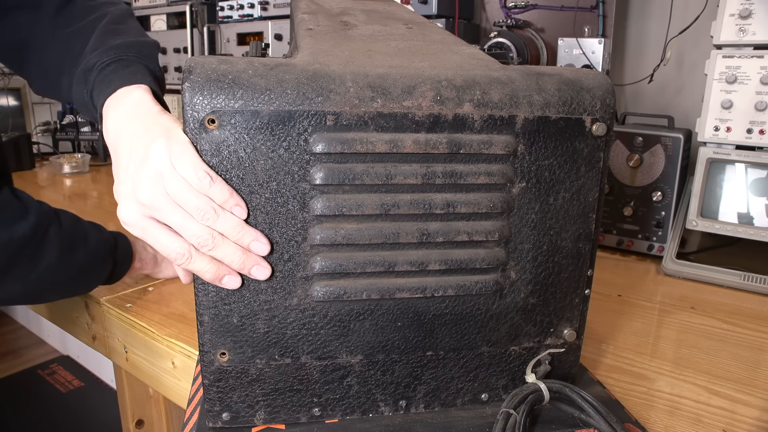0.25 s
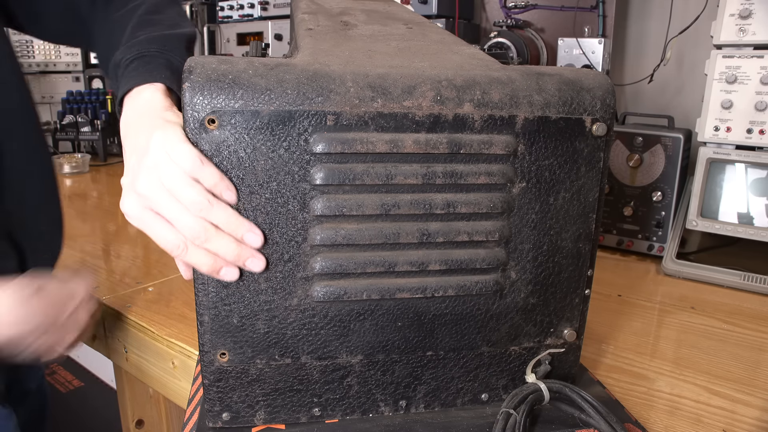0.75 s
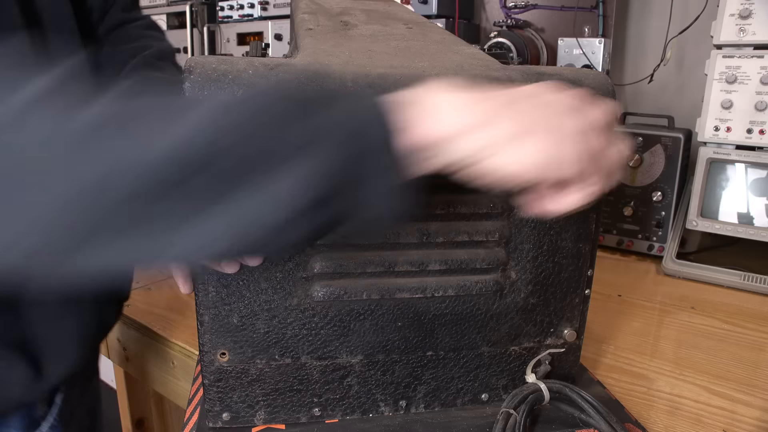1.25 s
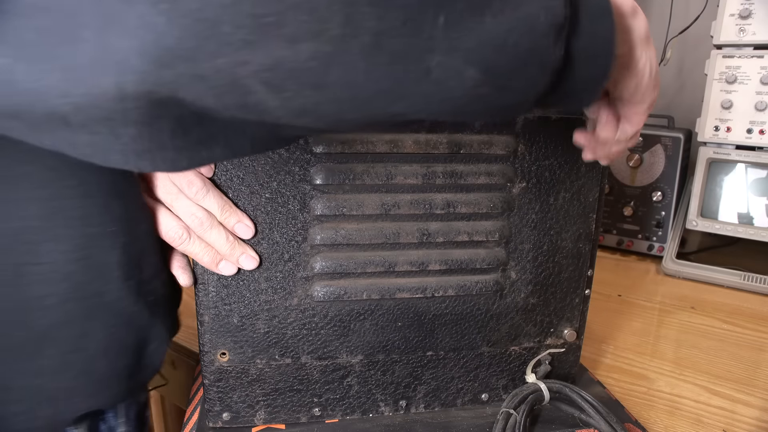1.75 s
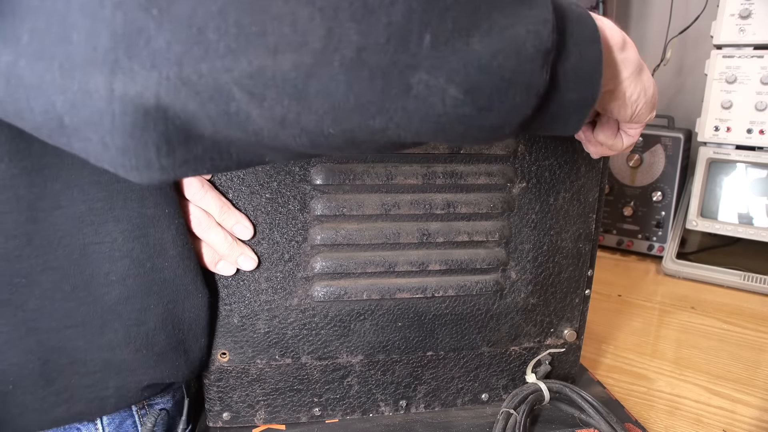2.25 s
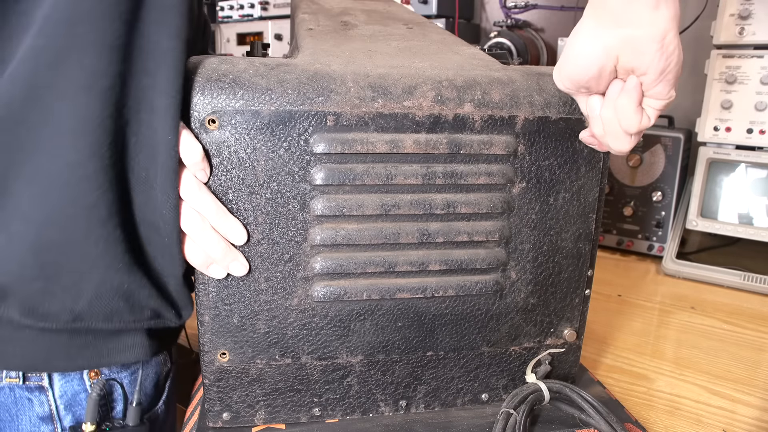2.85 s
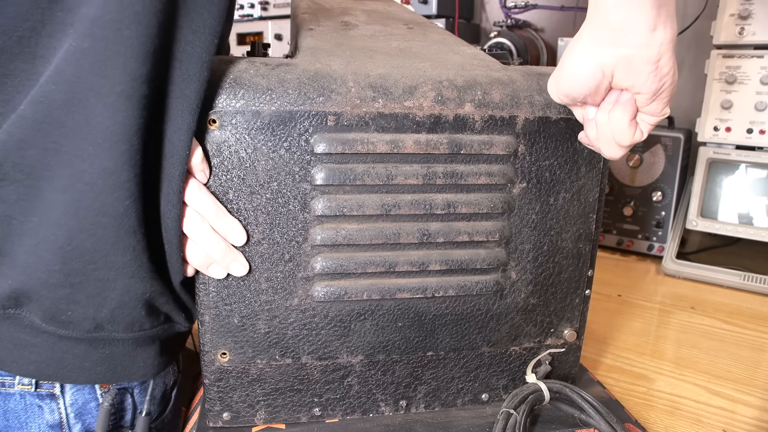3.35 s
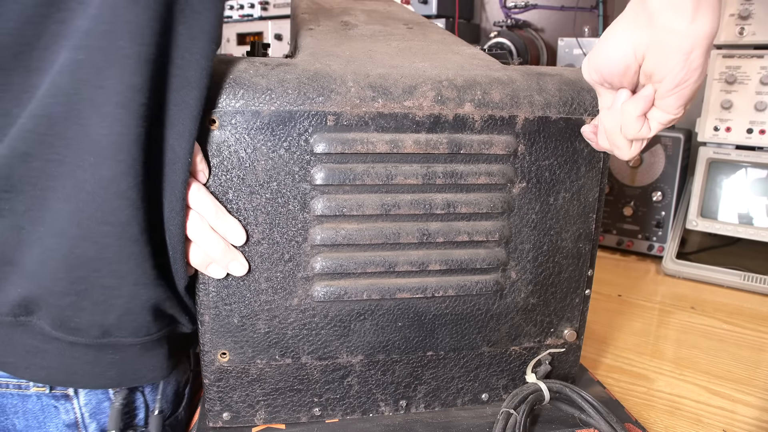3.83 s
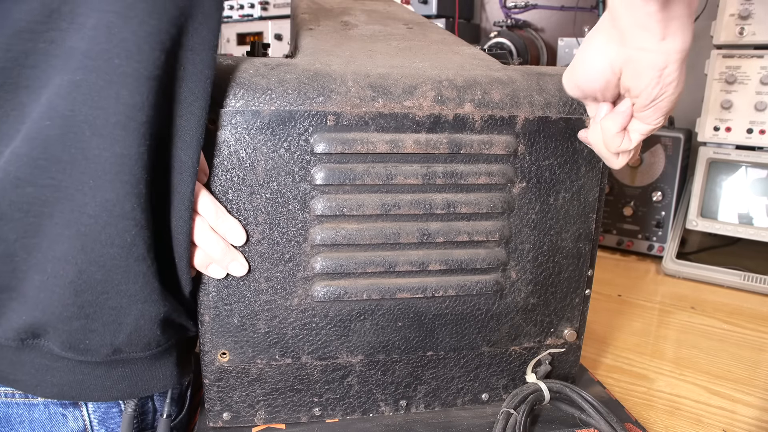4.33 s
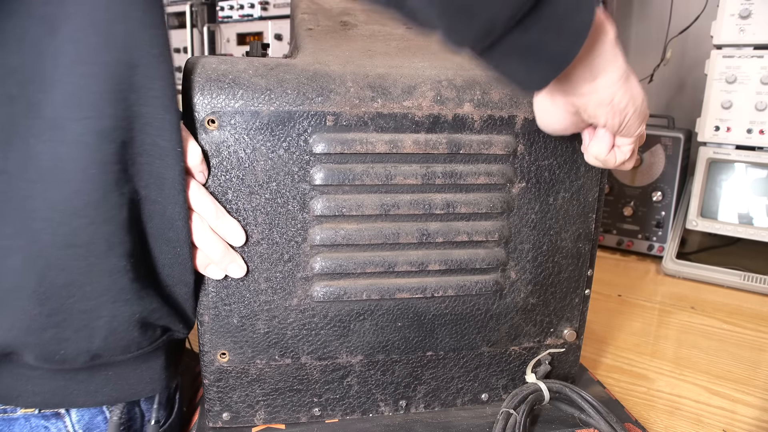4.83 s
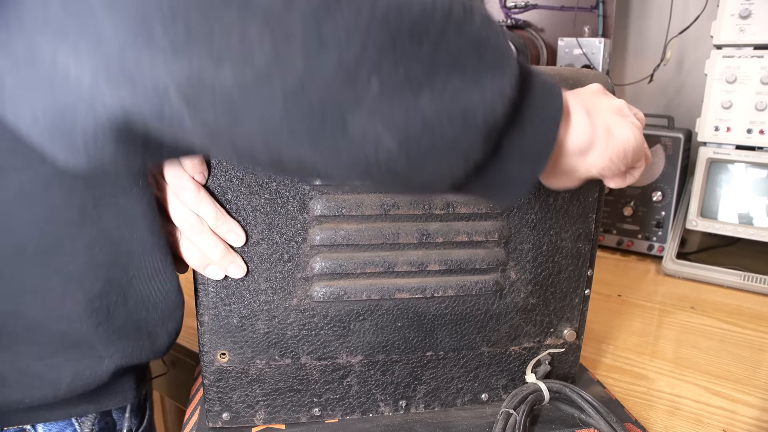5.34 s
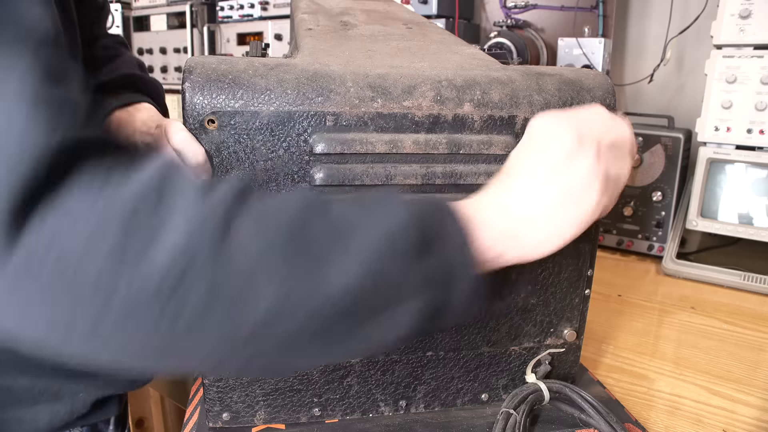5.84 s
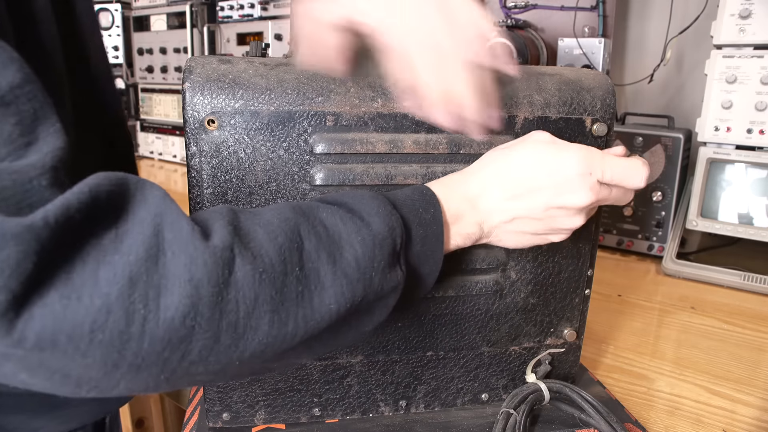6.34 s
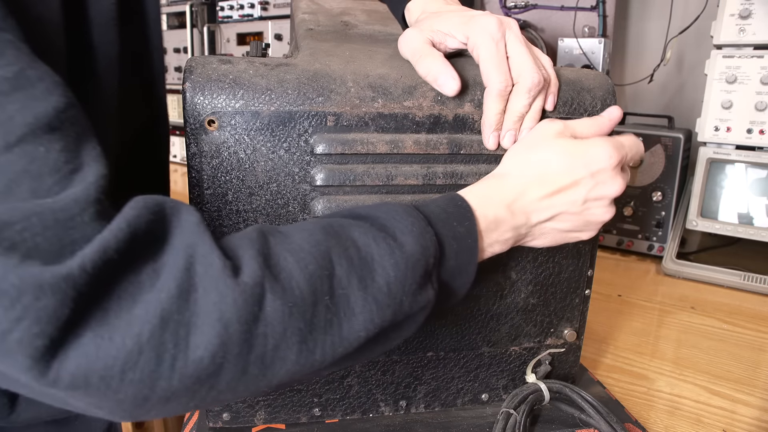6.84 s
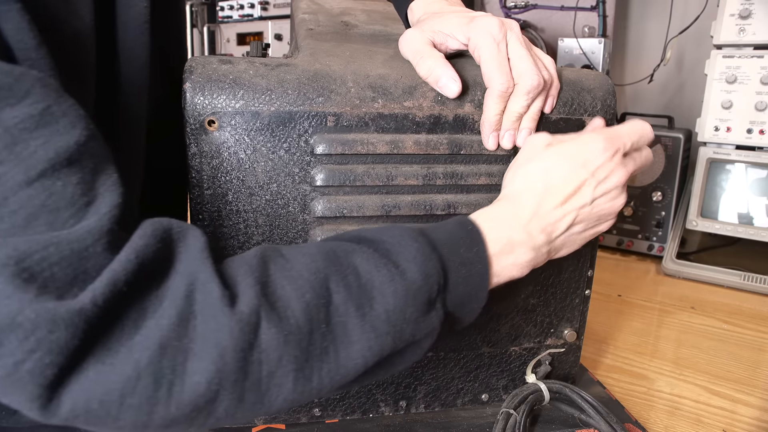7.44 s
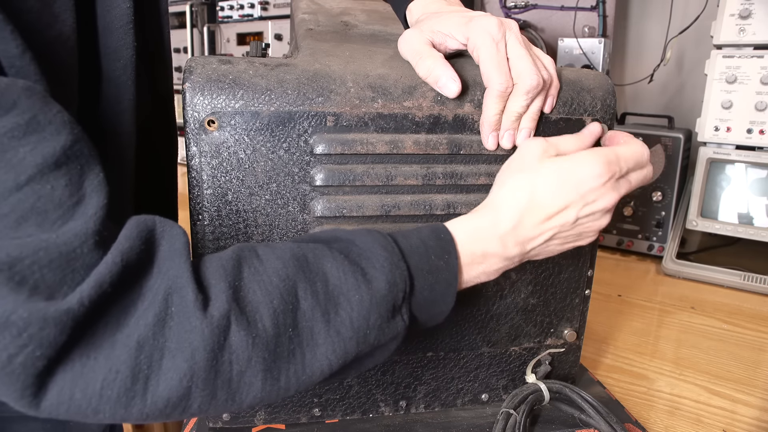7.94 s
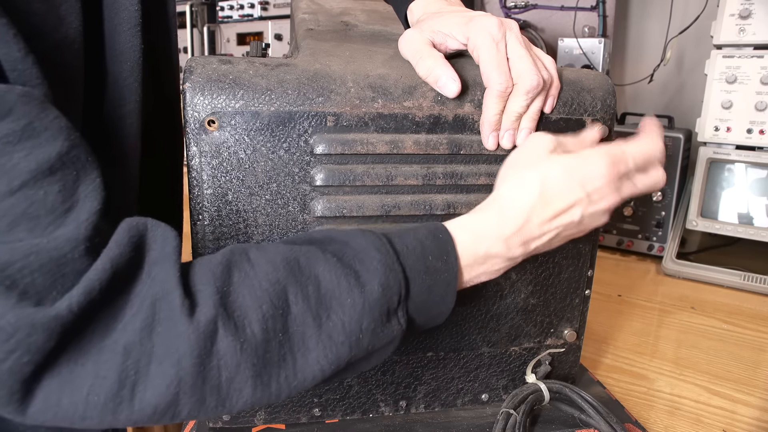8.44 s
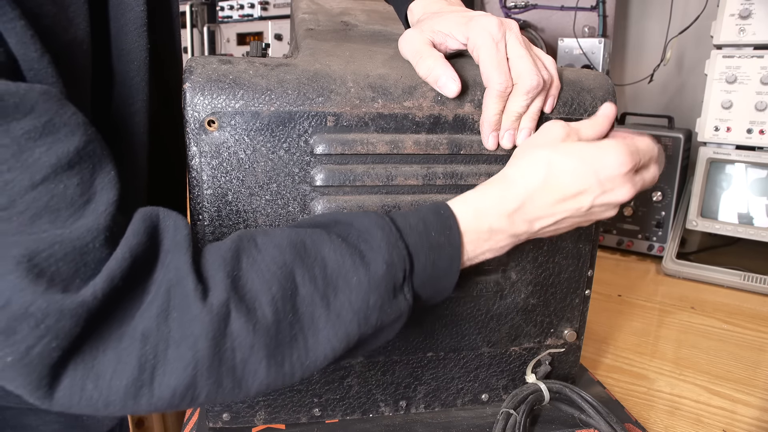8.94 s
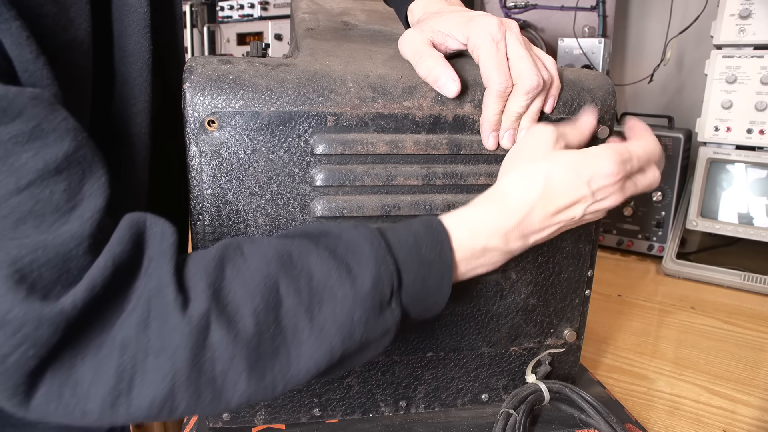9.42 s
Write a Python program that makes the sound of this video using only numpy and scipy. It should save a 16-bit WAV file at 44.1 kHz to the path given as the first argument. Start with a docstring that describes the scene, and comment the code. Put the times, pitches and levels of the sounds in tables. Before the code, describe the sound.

Hands rub and knock on a steel cabinet panel, with a sharp hardware clack, small ticks and ringing clatter as a screw turns.

```python
"""A small workshop: hands undo the screwed back panel of an old steel-and-wood cabinet on the bench. Hardware
clacks down and a ring lingers in the room. Palms and sleeves rub over the case in tiny slips. A loose screw,
twirled out by hand, grinds, squeaks once and clacks against the louvred steel panel, which rings. Leaning hands
rock the cabinet, which booms softly. Small dry ticks sound close by, over quiet air."""
import sys
import numpy as np
from scipy import signal
from scipy.fft import rfft, irfft, next_fast_len
from scipy.io import wavfile

SR = 44100
rng = np.random.default_rng(int(sys.argv[2]) if len(sys.argv) > 2 else 0)


def digitize_waveform(pressure):
    """Quantize a signal to 16-bit integers and store it at the path in sys.argv[1].

    Rows of a 2-D input are taken as channels; values are limited to [-1, 1].
    """
    field = np.atleast_2d(pressure).T
    bounded = np.clip(field, -1, 1)
    quanta = np.round(bounded * 32767).astype(np.int16)
    wavfile.write(sys.argv[1], SR, quanta)


N = 426888
TIME_S = np.arange(N) / SR
TAIL_S = TIME_S[:32768]

# Modes. Each row: frequency in Hz, level in dB, t60 in seconds.
STEEL_PANEL_MODES = [(244, -1.5, 0.34), (403, -1.5, 0.23), (625, -3.5, 0.38), (713, -2, 0.34),
                     (764.3, -1.5, 0.24), (829, -9, 0.41), (941, -2, 0.37), (1162, -6.5, 0.29),
                     (1417, -10, 0.2), (1634, -2, 0.24), (1923, -5.5, 0.2), (2077, -1.5, 0.22),
                     (2320, -2.5, 0.08), (2495, 3.5, 0.13), (3300, 1.5, 0.12), (4060, 1, 0.063),
                     (6330, 8, 0.11), (8250, 18.5, 0.026)]
BOX_MODES = [(91.6, 3.5, 0.43), (120, -7, 0.26), (162.3, -9, 0.28), (267.4, -13, 0.76)]  # cabinet and the air inside
LOOSE_SCREW_MODES = [(2610, 1, 0.13), (2780, -3, 0.2), (3140, -2, 0.23), (3592, -3, 0.14), (4050, -4, 0.24),
                     (5250, -4, 0.17)]
CLACK_RING_MODES = [(577, -3.5, 0.5), (1366, 0, 0.56), (1486, 4.5, 0.51), (1687, -1, 0.52), (1780, 6, 0.48),
                    (2070, 2, 0.56), (2365, 5, 0.47), (2680, -6, 0.68)]  # tones lingering after the hardware lands

# Screw clacks on the case. Each row: start in seconds, ring in dB, treble in dB re ring.
SCREW_CLACKS = [(5.926, -37.5, -5), (6.753, -38.5, -13.5), (6.823, -36, -2.5), (7.255, -42, -27),
                (7.634, -43, -3), (7.766, -28.5, -7), (7.824, -23.5, -9.5), (7.910, -34.5, -6.5),
                (8.165, -37, -6), (8.185, -37, -4), (8.2704, -37.5, -13), (8.338, -30.5, -21),
                (8.36, -29, -7.5), (8.721, -34, -3), (8.728, -24, -2.5), (8.9331, -32, 0.5),
                (9.149, -29, -8), (9.223, -30.5, -8.5), (9.236, -33.5, -11), (9.261, -36.5, -8.5),
                (9.592, -39.5, -17)]
# Hands bump the case. Each row: start in seconds, ring in dB, bass and treble in dB re ring.
HAND_KNOCKS = [(0.949, -48.5, -7, -22), (1.72, -48.5, -2.5, -23), (1.791, -32.5, -4.5, -7),
               (1.796, -24, -10, -31.5), (1.819, -33, -4.5, -38), (3.712, -41, 5, -13.5),
               (3.733, -42.5, 5.5, -37.5), (4.266, -56, -7, -15), (4.403, -53, 6.5, -32),
               (4.567, -51, -14, -18), (6.133, -33.5, -9, -22.5), (6.241, -40, -9, -21.5)]
# Hardware lands. Each row: start in seconds, crack and ring in dB, bass and treble in dB re ring.
HARDWARE_HITS = [(0.1755, -33, -24.5, -10, -29), (0.1926, -7, -20.5, -14.5, -11.5)]
# A hand leans on the cabinet. Each row: start and creep half length in seconds, boom and palm in dB.
HAND_PUSHES = [(1.801, 0.16, -40.5, -53.5), (2.45, 0.089, -38.5, -47.5), (2.79, 0.18, -48, -50),
               (3.25, 0.44, -55, -54), (3.726, 0.061, -53, -48), (4.41, 0.068, -50, -48),
               (5.60, 0.093, -61, -48.5), (5.894, 0.076, -32.5, -43), (6.133, 0.1, -33.5, -45.5),
               (6.52, 0.095, -52, -46.5), (6.746, 0.12, -35, -49), (7.509, 0.078, -39.5, -48),
               (8.195, 0.074, -25, -42.5), (8.599, 0.037, -33, -50.5), (8.956, .05, -27.5, -41.5),
               (9.245, 0.15, -26.5, -43)]
# Arm sweeps. Each row: peak time and half length in seconds, skin and sleeve in dB, swish centre in Hz.
ARM_STROKES = [(0.13, 0.1, -55, -59.5, 9000), (0.704, .22, -60, -53, 9400), (1.315, 0.14, -68, -59.5, 9000),
               (1.792, .012, -39, -50, 9000), (1.968, .22, -67, -56, 11000),
               (2.489, 0.043, -51, -50.5, 8100), (2.589, 0.054, -55.5, -47.5, 7800),
               (2.782, 0.062, -68, -52, 8000), (3.05, .1, -63, -55.5, 9000), (3.277, 0.083, -58, -63, 9000),
               (3.7, 0.13, -56.5, -56, 9000), (5.65, 0.096, -51.5, -55.5, 11000),
               (5.966, 0.083, -64, -50, 13000), (6.136, 0.031, -56, -53, 13500),
               (6.29, 0.24, -58.5, -55, 11000), (6.572, 0.03, -47, -43, 12900),
               (6.71, 0.12, -52, -54, 11000), (6.952, 0.038, -59, -52.5, 13000),
               (7.205, .03, -64, -57, 11000), (7.35, .1, -57, -68, 11000), (7.55, 0.067, -48, -56.5, 12000),
               (8.661, 0.049, -48.5, -47, 11000), (9.0, 0.2, -46, -58, 10000),
               (9.454, 0.13, -48, -54, 9000), (9.517, 0.015, -59.5, -44, 13000)]
# The screw turns. Each row: peak time and half length in seconds, level in dB.
THREAD_GRINDS = [(6.57, 0.022, -53), (6.79, 0.023, -43), (8.277, 0.0096, -35.5), (9.395, 0.03, -46.5),
                 (9.432, 0.022, -35)]
# Close ticks. Each row: start in seconds, peak in dB, lower band edge in Hz.
DRY_TICKS = [(2.821, -24.5, 1890), (3.33, -31.5, 1200), (4.207, -18.5, 3330), (4.209, -19, 3200),
             (4.235, -26, 5000), (4.44, -34, 1400), (4.458, -29, 1390), (4.526, -27.5, 3200),
             (4.857, -29.5, 3200), (5.241, -30.5, 3220), (5.326, -32, 3220)]

# Spectra of dense ringing and noise. Each row: frequency in Hz, relative spectral density in dB.
PANEL_SPECTRUM = [(100, 3.5), (250, 3), (500, -5.5), (800, -1), (1300, 0), (3300, -0.5), (5000, -0.5),
                  (8500, 3), (12000, 0), (16000, -21)]
CLACK_RING_SPECTRUM = [(100, -9), (350, -6), (550, -4), (1000, -0.5), (1700, 4.5), (2700, 3.5), (3800, 1),
                       (5500, 2), (9000, -7), (16000, -19)]
THREAD_SPECTRUM = [(500, -33), (1000, -5), (1800, 2), (3800, 2.5), (6000, -12.5), (14000, -31)]
PALM_SPECTRUM = [(70, -14), (140, 4.5), (200, -1.5), (300, -9.5), (420, -7), (550, -23), (1000, -22.5),
                 (2500, -58)]
SKIN_SPECTRUM = [(350, -16), (600, -1), (820, -1.5), (1200, -3.5), (2500, -13.5), (4500, -22.5),
                 (8000, -56)]
SLEEVE_SPECTRUM = [(1200, 0), (3000, 2), (6000, 0), (8500, -0.5), (12000, -1), (16000, -10)]
RUMBLE_SPECTRUM = [(15, -41), (30, -10), (55, -1.5), (72, 4.5), (90, -4), (115, -2), (170, -13),
                   (400, -37.5)]
AIR_SPECTRUM = [(15, -25), (25, -0.5), (74, 3.5), (317, -19.5), (531, -23.5), (607, -22), (1790, -25),
                (10100, -26.5), (13600, -28.5), (16000, -37)]

# Decay of the dense ring and of the room. Each row: frequency in Hz, t60 in seconds.
RING_DECAY = [(200, 0.28), (1000, 0.36), (3000, 0.16), (8000, 0.098), (15000, 0.079)]
ROOM_DECAY = [(100, 0.95), (500, 0.8), (1500, 0.57), (3000, 0.46), (6000, 0.5), (14000, 0.77)]


def panel(clack_bass_db=-19.5, crack_over_ring_db=21.5):
    """Hands and the screw strike the case and ring the steel; harder contacts crack more."""
    out = np.zeros(N)
    build_up = 1 - np.exp(-TAIL_S / 0.0013)  # bending waves spread over the sheet
    clacks = [(start_s, db, clack_bass_db, treble_db) for start_s, db, treble_db in SCREW_CLACKS]
    for start_s, ring_db, bass_db, treble_db in list(HAND_KNOCKS) + clacks:
        softness_db = 0.57 * max(0, -treble_db - 22)  # padded blows favour the few hollow modes
        hand_damping_db_per_s = 13 * softness_db
        wash = dense_ring(PANEL_SPECTRUM, bass_db, treble_db, room_db=-11.5, room_treble_db=-7)
        wash *= from_db(-1 - 0.32 * softness_db)
        tones = struck(STEEL_PANEL_MODES, bass_db, treble_db, spread_db=3)
        tones *= from_db(softness_db - 11 - hand_damping_db_per_s * TAIL_S)
        crack_db = ring_db + crack_over_ring_db + 0.75 * treble_db
        add(out, start_s, from_db(crack_db) * crack(low_hz=1480, high_hz=4420, t60_s=0.019))
        add(out, start_s, from_db(ring_db) * build_up * (wash + tones))
    return out


def hardware_clack(snap_hz=2700, snap_over_crack_db=2.5, snap_t60_s=0.0058):
    """Hardware touches, then clacks down: it snaps briefly and a ring lingers in the room."""
    out = np.zeros(N)
    snap = from_db(snap_over_crack_db - 60 * TAIL_S / snap_t60_s) * np.sin(2 * np.pi * snap_hz * TAIL_S)
    for start_s, crack_db, ring_db, bass_db, treble_db in HARDWARE_HITS:
        wash = dense_ring(CLACK_RING_SPECTRUM, bass_db, treble_db, room_db=0.7, room_treble_db=-8,
                          uneven_db=2.5)
        tones = struck(CLACK_RING_MODES, bass_db, treble_db, spread_db=2)
        add(out, start_s, from_db(crack_db) * crack(low_hz=1120, high_hz=3800, t60_s=0.0091))
        add(out, start_s, from_db(crack_db) * snap)
        add(out, start_s, from_db(ring_db) * (from_db(-0.7) * wash + from_db(-15.5) * tones))
    return out


def cabinet(rise_s=0.011, spread_db=2.9):
    """Soft pushes swell into the low modes of the box."""
    out, bank = np.zeros(N), mode_bank(BOX_MODES)
    for start_s, _, boom_db, _ in HAND_PUSHES:
        boom = from_db(rng.normal(0, spread_db, len(bank))) @ bank
        add(out, start_s, from_db(boom_db) * boom * (1 - np.exp(-TAIL_S / rise_s)))
    return out


def screw_squeak(start_s=8.669, length_s=0.011, start_hz=4400, end_hz=4050, level_db=-20):
    """The thread sticks and slips in one rough, falling chirp, echoed by nearby surfaces."""
    t = TAIL_S[:round(length_s * SR)]
    waver = 1 + 0.03 * drift(1500)[:len(t)]
    phase = 2 * np.pi * np.cumsum(np.linspace(start_hz, end_hz, len(t)) * waver) / SR
    chirp = sum(from_db(-9 * k) * np.sin((k + 1) * phase) for k in range(3))
    chirp *= np.sqrt(np.sin(np.pi * t / length_s))
    echo_db, echo_t60_s = -2, 0.099
    echoes = rng.standard_normal(len(TAIL_S)) * from_db(-60 * TAIL_S / echo_t60_s) * (TAIL_S > 0.003)
    echoes *= from_db(echo_db) / np.linalg.norm(echoes)
    echoes[0] = 1  # direct sound
    out = np.zeros(N)
    add(out, start_s, from_db(level_db) * signal.fftconvolve(chirp, echoes))
    return out


def screw_clink(start_s=5.927, level_db=-37):
    """Fingers flick the loose screw; it rings in its hole."""
    out = np.zeros(N)
    add(out, start_s, from_db(level_db) * mode_bank(LOOSE_SCREW_MODES).sum(axis=0))
    return out


def screw_grind():
    """The turning thread grinds with a fast judder."""
    slips = friction(slips_per_s=2300, grain_db=2.5, hiss_gain=1, judder_db=3, judder_per_s=190)
    return swells(THREAD_GRINDS) * coloured(rubbed(slips, lift_db=-3, damping_hz=30), THREAD_SPECTRUM)


def palm_creep():
    """The palm creeps over the case after each push."""
    pressing = swells([(start_s + half_s, half_s, db) for start_s, half_s, _, db in HAND_PUSHES])
    slips = friction(slips_per_s=1200, grain_db=0.5, hiss_gain=1, judder_db=3.5, judder_per_s=35)
    return pressing * coloured(rubbed(slips, lift_db=2.5, damping_hz=22.1), PALM_SPECTRUM)


def skin_slide():
    """Skin slides over the steel with each stroke."""
    sliding = swells([row[:3] for row in ARM_STROKES])
    slips = friction(slips_per_s=1500, grain_db=6, hiss_gain=2.15, judder_db=4, judder_per_s=45)
    return sliding * coloured(rubbed(slips, lift_db=4.5, damping_hz=6.8), SKIN_SPECTRUM)


def sleeves(swish_db=-4.5, swish_width_hz=2600):
    """Cloth brushes the case: a grainy hiss, one band lifted by the weave."""
    slips = friction(slips_per_s=3500, grain_db=2.5, hiss_gain=1.4, judder_db=2, judder_per_s=61)
    cloth = coloured(slips, SLEEVE_SPECTRUM)
    out = np.zeros(N)
    for peak_s, half_s, _, db, swish_hz in ARM_STROKES:
        swish = signal.lfilter(*signal.iirpeak(swish_hz, swish_hz / swish_width_hz, fs=SR), cloth)
        out += swells([(peak_s, half_s, db)]) * unit_rms(cloth + from_db(swish_db) * swish)
    return out


def ticks(band_ratio=4.8, ring_hz=1000, ring_db=-9, ring_t60_s=0.013):
    """Bright, dry ticks; the strongest rings for a few cycles."""
    out = np.zeros(N)
    for start_s, peak_db, low_hz in DRY_TICKS:
        add(out, start_s, from_db(peak_db) * crack(low_hz, band_ratio * low_hz, t60_s=0.0065))
    start_s, peak_db, _ = max(DRY_TICKS, key=lambda row: row[1])
    ring = from_db(ring_db - 60 * TAIL_S / ring_t60_s) * np.cos(2 * np.pi * ring_hz * TAIL_S)
    add(out, start_s, from_db(peak_db) * ring)
    return out


def bench_rumble(over_palm_db=1, stretch=1.87):
    """Leaning weight makes the bench rumble, outlasting the palm's creep."""
    leaning = swells([(start_s + half_s, stretch * half_s, palm_db + over_palm_db)
                      for start_s, half_s, _, palm_db in HAND_PUSHES])
    return leaning * coloured(rng.standard_normal(N), RUMBLE_SPECTRUM)


def workshop_air(rms_db=-53.5):
    """Quiet, steady room noise."""
    return from_db(rms_db) * coloured(rng.standard_normal(N), AIR_SPECTRUM)


def crack(low_hz, high_hz, t60_s):
    """First instant of a hard contact: a spike and a short spray; peak 1."""
    t = TAIL_S[:1024]
    spray = 0.18 * rng.standard_normal(len(t)) * from_db(-60 * t / t60_s)
    spray[0] = 1.38
    band_hz = [low_hz, min(high_hz, SR / 2 - 1000)]
    burst = signal.sosfilt(signal.butter(1, band_hz, "band", fs=SR, output="sos"), spray)
    burst = signal.sosfilt(signal.butter(2, low_hz, "high", fs=SR, output="sos"), burst)
    return burst / np.abs(burst).max()


def dense_ring(spectrum, bass_db, treble_db, room_db, room_treble_db, cluster_hz=70, uneven_db=4):
    """Crowded modes wake in clusters and die by band; the room carries them on, its walls dull them."""
    hz = np.fft.rfftfreq(len(TAIL_S), 1 / SR)
    clusters = np.interp(hz / cluster_hz, np.arange(len(hz)), rng.standard_normal(len(hz)))
    gain = from_db(at_hz(spectrum, hz) + uneven_db * clusters * (hz > 1000))
    gain /= np.sqrt(np.mean(gain ** 2 * ((hz > 700) & (hz < 4500))))
    noise_bins = rfft(rng.standard_normal(len(TAIL_S))) * gain * contact(hz, bass_db, treble_db)
    octaves_hz = np.geomspace(125, 16000, 8)
    room_rise = 1 - np.exp(-TAIL_S / 0.0043)
    out = np.zeros(len(TAIL_S))
    for centre_hz, share in zip(octaves_hz, np.eye(len(octaves_hz))):
        band = irfft(noise_bins * at_hz(np.c_[octaves_hz, share], hz))
        direct = from_db(-60 * TAIL_S / at_hz(RING_DECAY, centre_hz))
        wet_db = room_db + at_hz([(2000, 0), (9000, room_treble_db)], centre_hz)
        room = from_db(wet_db - 60 * TAIL_S / at_hz(ROOM_DECAY, centre_hz)) * room_rise
        out += band * np.hypot(direct, room)
    return out


def struck(modes, bass_db, treble_db, spread_db):
    """Each blow lands on another spot, waking the modes with new strengths and signs."""
    hz = np.array(modes)[:, 0]
    strengths = from_db(spread_db * rng.standard_normal(len(hz))) * rng.choice([-1, 1], len(hz))
    return (strengths * contact(hz, bass_db, treble_db)) @ mode_bank(modes)


def contact(hz, bass_db, treble_db):
    """Broad soft contacts wake the bass and mute upper modes; small hard ones wake the treble."""
    muted_db = min(0, treble_db / 2 + 11)
    spectrum = [(450, bass_db + 9.5), (620, 0), (900, 0), (1500, muted_db),
                (3800, treble_db / 2 + 5), (6000, treble_db)]
    return from_db(at_hz(spectrum, hz))


def mode_bank(modes):
    """One decaying sine per mode."""
    hz, db, t60_s = np.transpose(modes)[:, :, None]
    return from_db(db - 60 * TAIL_S / t60_s) * np.sin(2 * np.pi * hz * TAIL_S)


def friction(slips_per_s, grain_db, hiss_gain, judder_db, judder_per_s):
    """Tiny slips of uneven size over a smooth hiss, swelling in clumps."""
    sizes = from_db(grain_db * np.minimum(rng.exponential(1, N), 5)) * rng.choice([-1, 1], N)
    slips = unit_rms(sizes * (rng.random(N) < slips_per_s / SR))
    return (slips + hiss_gain * rng.standard_normal(N)) * from_db(judder_db * drift(judder_per_s))


def rubbed(slips, lift_db, damping_hz):
    """Friction sings in the panel's modes, widened by the hand's touch."""
    out = slips.copy()
    for hz, db, t60_s in STEEL_PANEL_MODES:
        radius = from_db(-60 / (t60_s * SR)) * np.exp(-np.pi * damping_hz / SR)
        feedforward = np.array([1, 0, -1]) * (1 - radius ** 2) / 2
        feedback = [1, -2 * radius * np.cos(2 * np.pi * hz / SR), radius ** 2]
        out += from_db(db + lift_db) * signal.lfilter(feedforward, feedback, slips)
    return out


def swells(rows):
    """Gain of bell-shaped movements, summed in power."""
    peak_s, half_s, db = np.transpose(rows)
    coarse_s = TIME_S[::64]
    bells = np.exp(-((coarse_s - peak_s[:, None]) / half_s[:, None]) ** 2)
    return np.sqrt(np.interp(TIME_S, coarse_s, from_db(db) ** 2 @ bells))


def coloured(noise, spectrum):
    """Noise shaped by a spectrum; rms 1."""
    size = next_fast_len(len(noise))
    gain = from_db(at_hz(spectrum, np.fft.rfftfreq(size, 1 / SR)))
    return unit_rms(irfft(rfft(noise, size) * gain, size)[:len(noise)])


def drift(knots_per_s):
    """Smooth random wander; rms 1."""
    knots = rng.standard_normal(4096)
    return unit_rms(np.interp(TIME_S * knots_per_s, np.arange(len(knots)), knots))


def at_hz(points, hz):
    """Table lookup on a log-frequency axis."""
    points_hz, values = np.transpose(points)
    return np.interp(np.log(np.maximum(hz, 1)), np.log(points_hz), values)


def add(out, start_s, sound):
    """Mix a sound in at start_s."""
    start = round(start_s * SR)
    out[start:start + len(sound)] += sound[:N - start]


def from_db(db):
    """Decibels to gain."""
    return 10 ** (np.asarray(db) / 20)


def unit_rms(x):
    """Scale to rms 1."""
    return x / np.sqrt(np.mean(x ** 2) + 1e-20)


def scene():
    """All the handling over the workshop air; mono."""
    air = workshop_air()
    impacts = hardware_clack() + panel() + screw_clink() + cabinet() + ticks()
    handling = screw_squeak() + palm_creep() + skin_slide() + screw_grind() + bench_rumble() + sleeves()
    return (impacts + handling + air)[None]


def record(dry):
    """Steep low-pass at 16 kHz."""
    return signal.sosfilt(signal.ellip(10, 0.1, 90, 16000, fs=SR, output="sos"), dry)


dry = scene()
out = record(dry)
digitize_waveform(out)
```